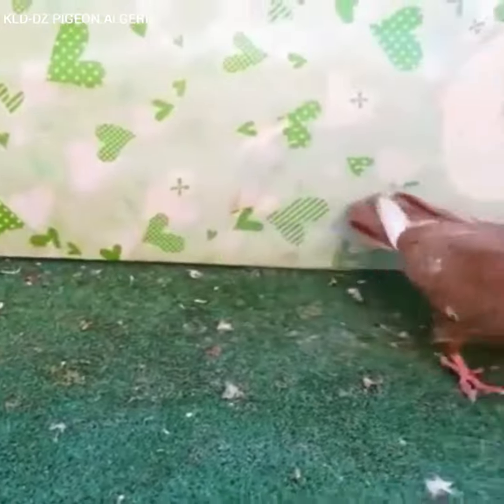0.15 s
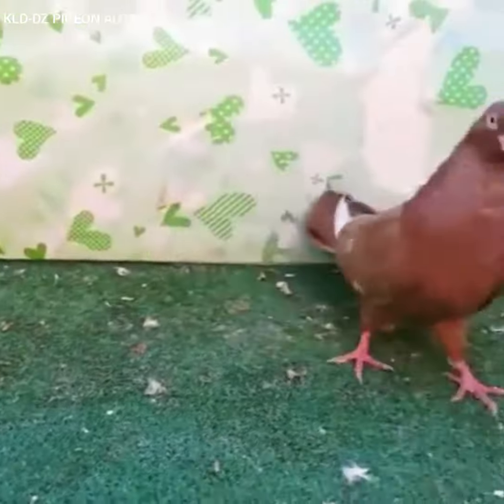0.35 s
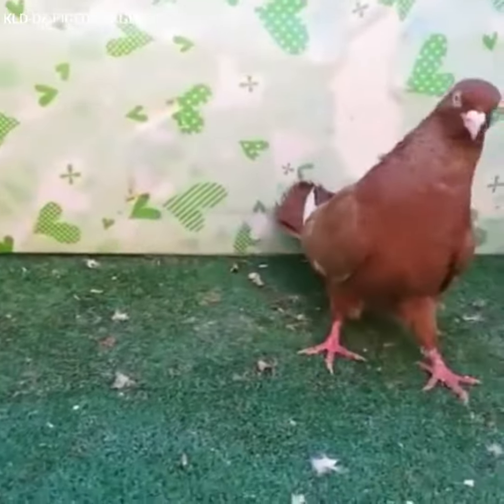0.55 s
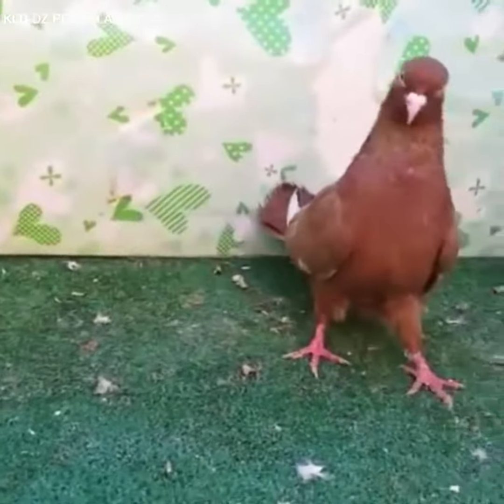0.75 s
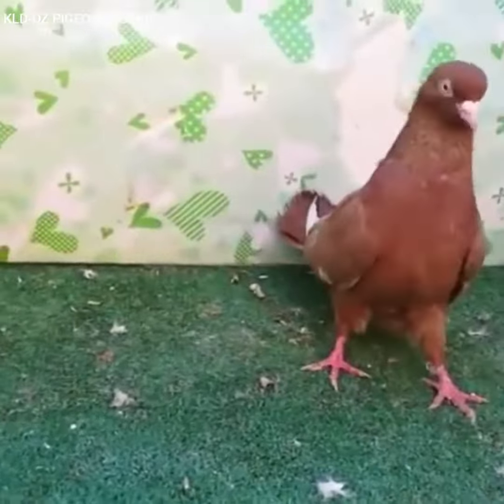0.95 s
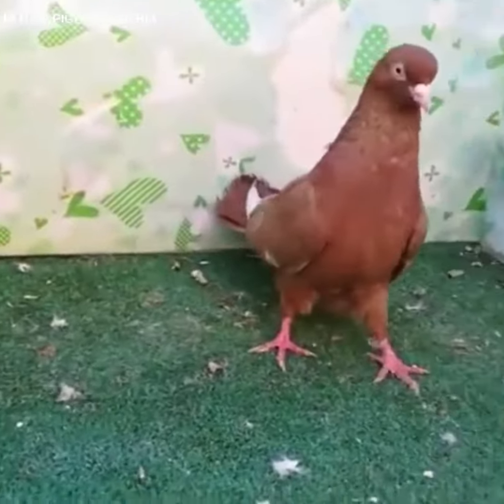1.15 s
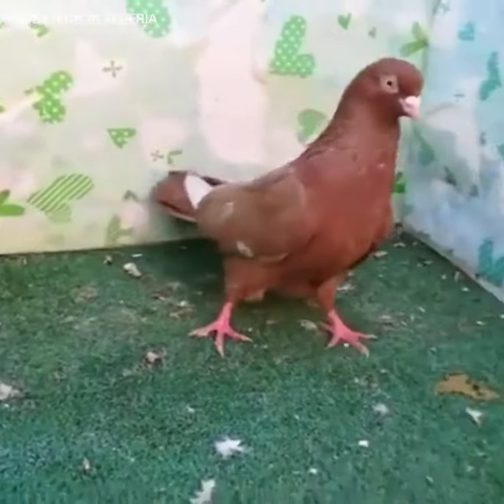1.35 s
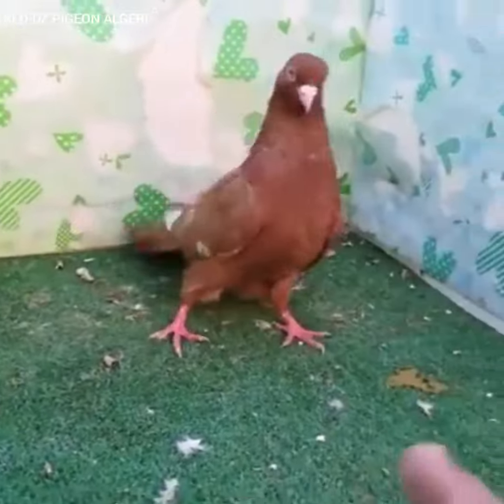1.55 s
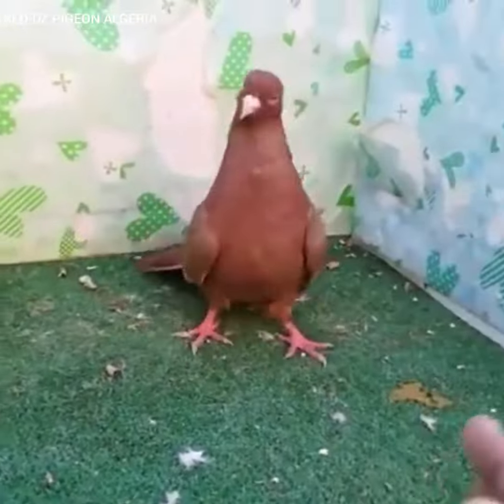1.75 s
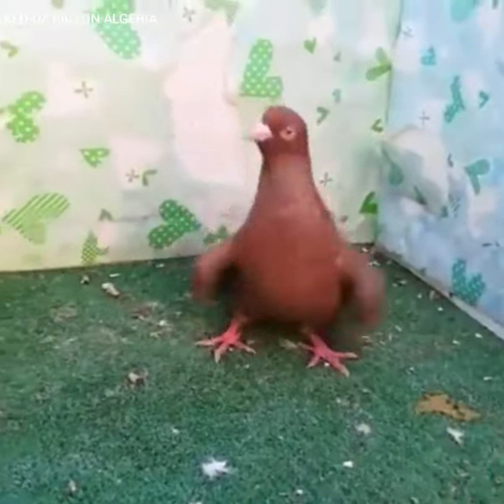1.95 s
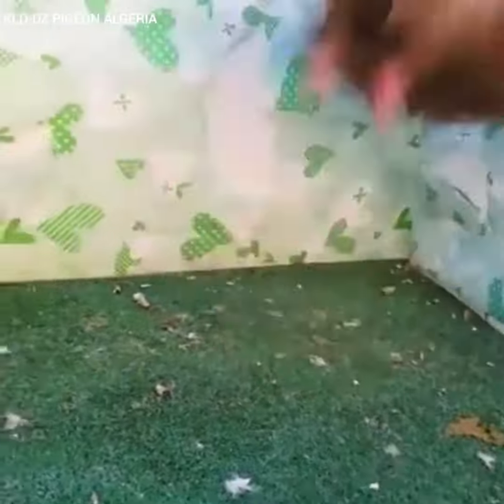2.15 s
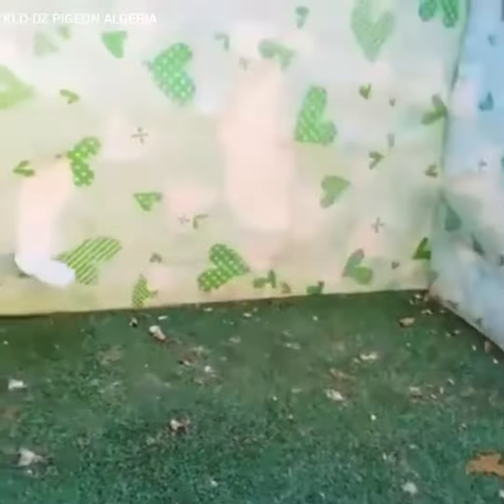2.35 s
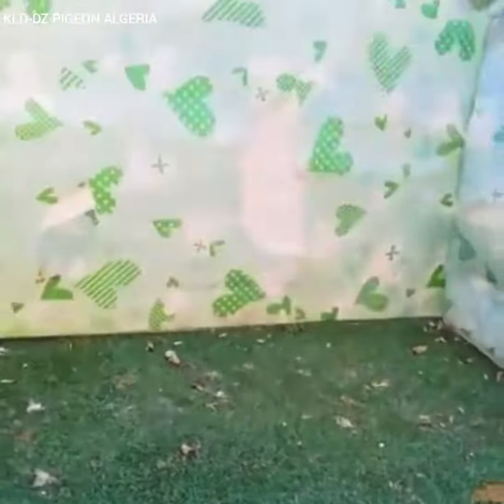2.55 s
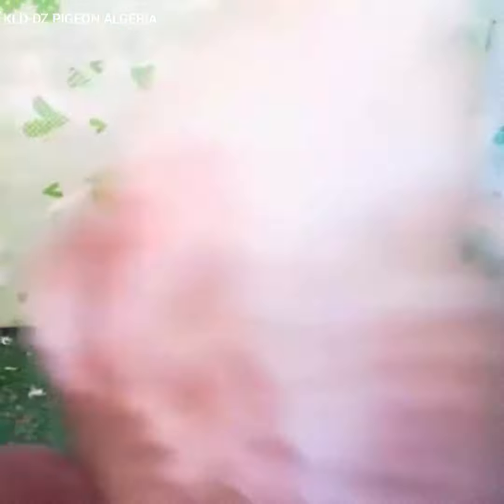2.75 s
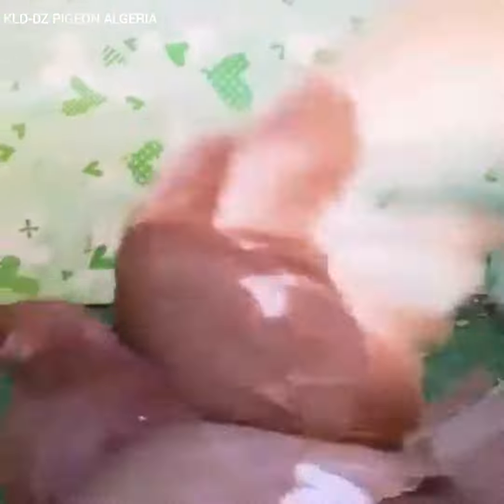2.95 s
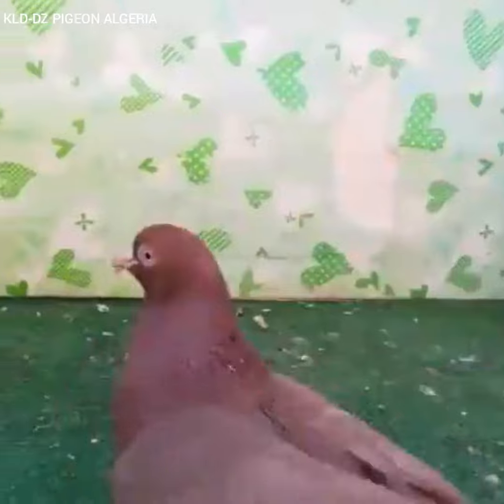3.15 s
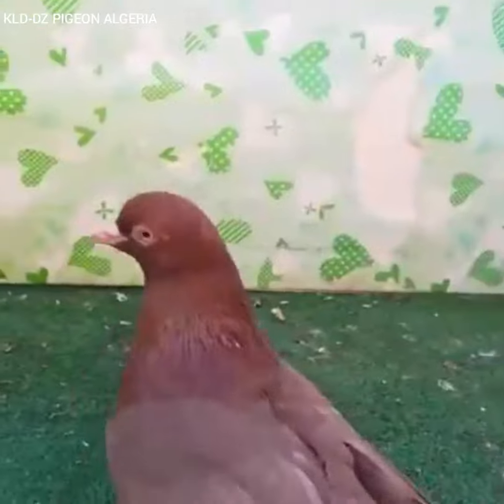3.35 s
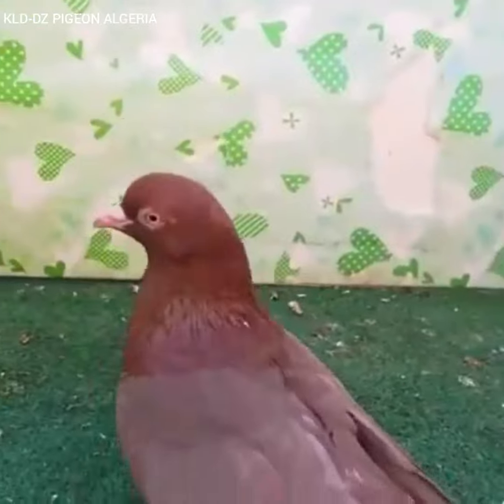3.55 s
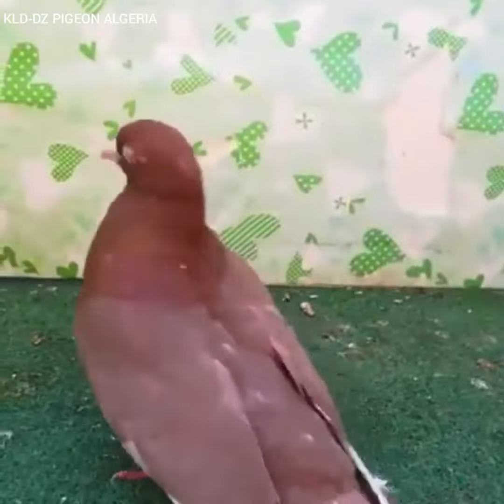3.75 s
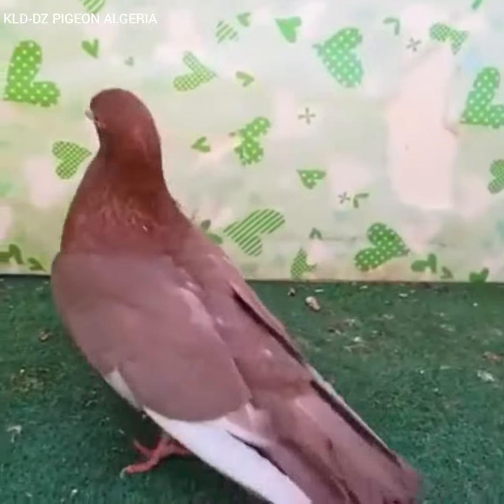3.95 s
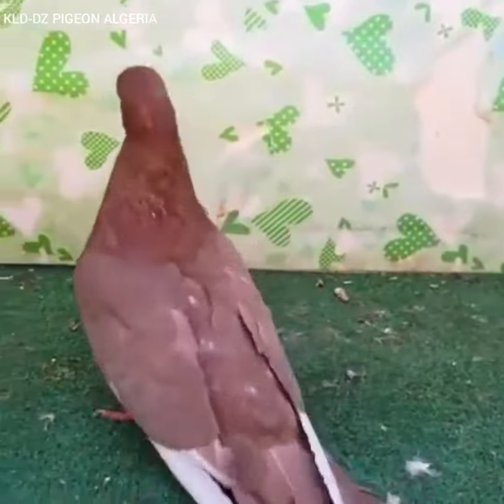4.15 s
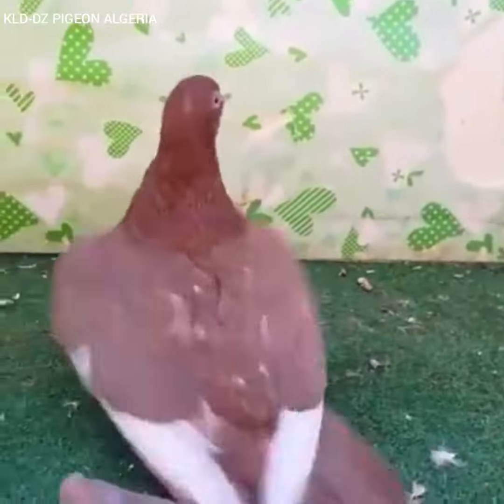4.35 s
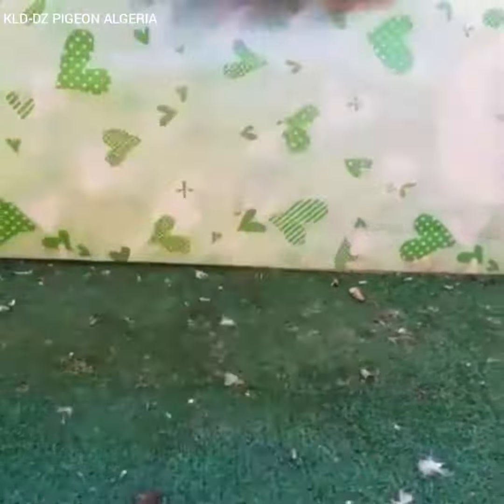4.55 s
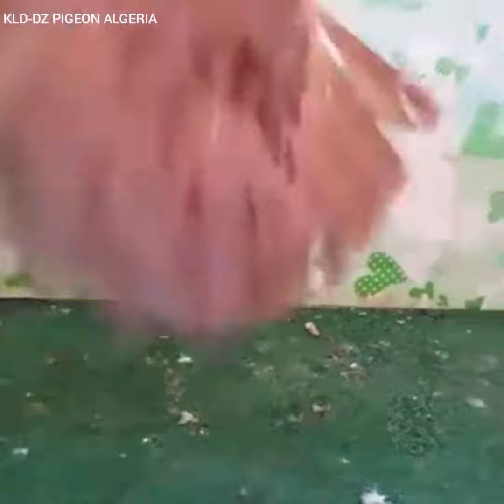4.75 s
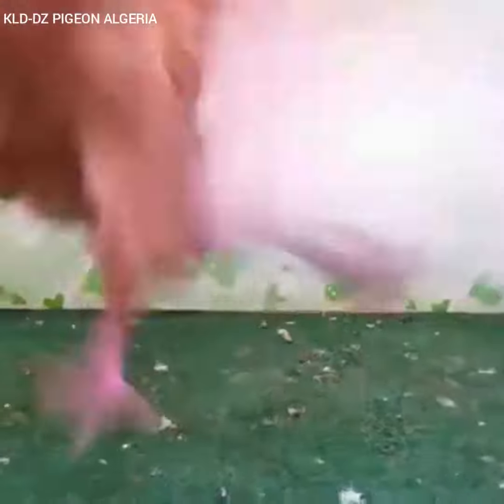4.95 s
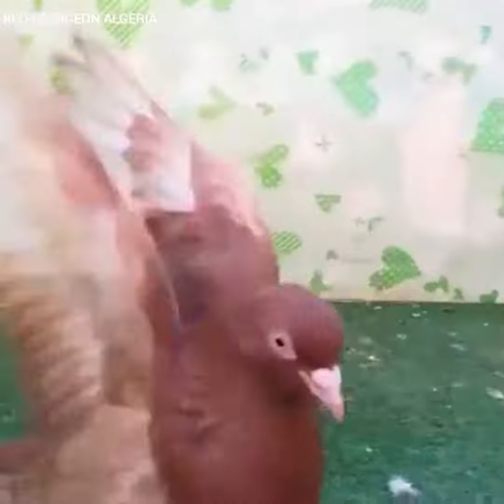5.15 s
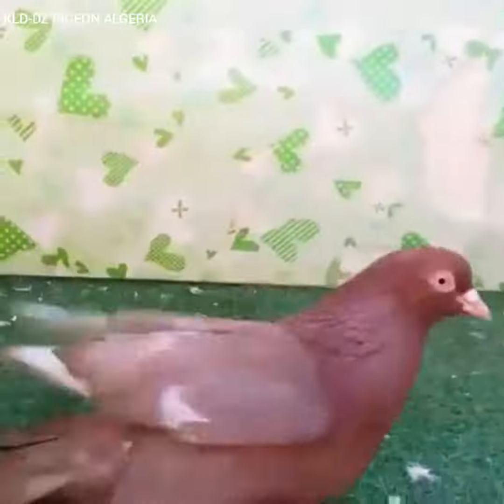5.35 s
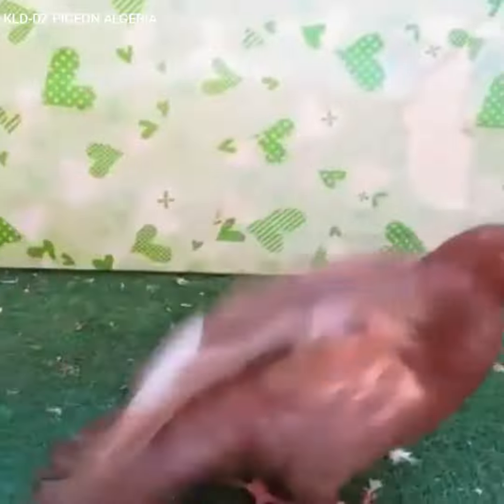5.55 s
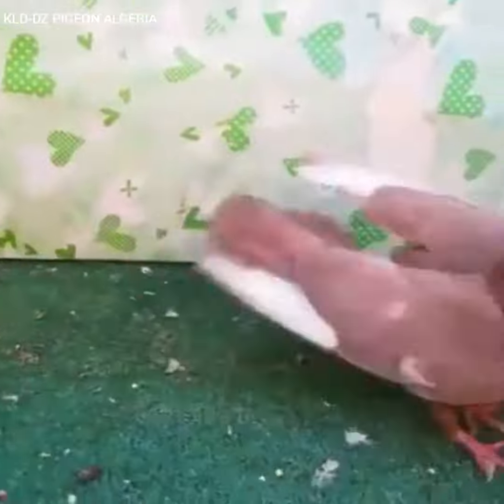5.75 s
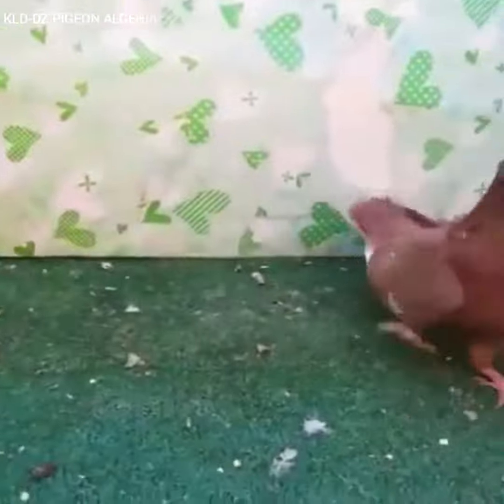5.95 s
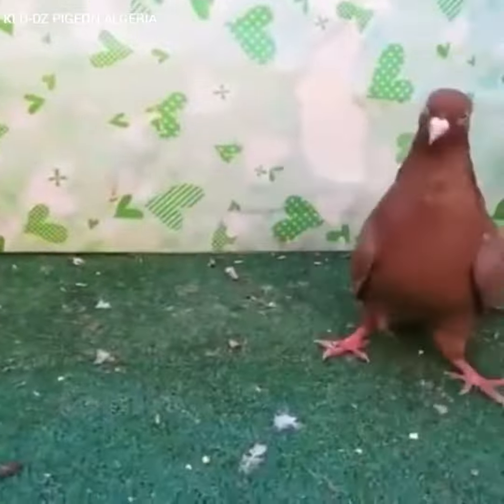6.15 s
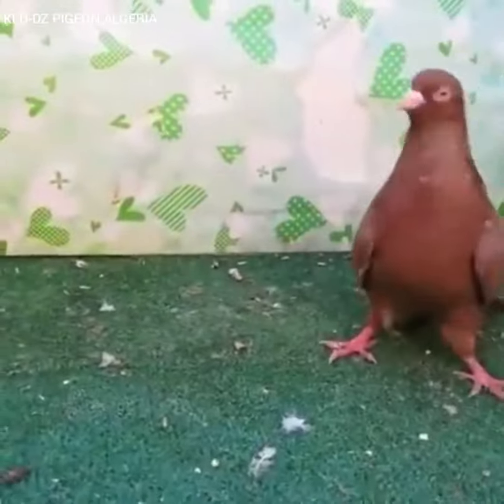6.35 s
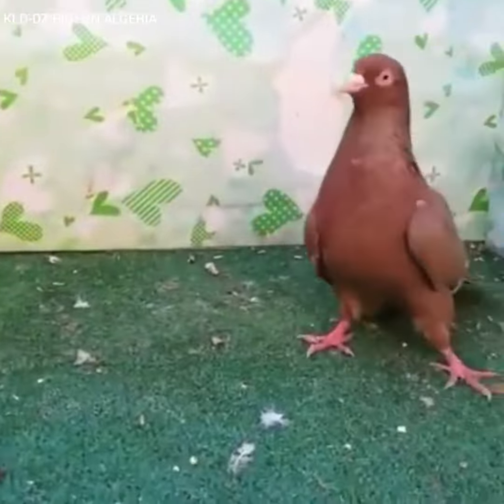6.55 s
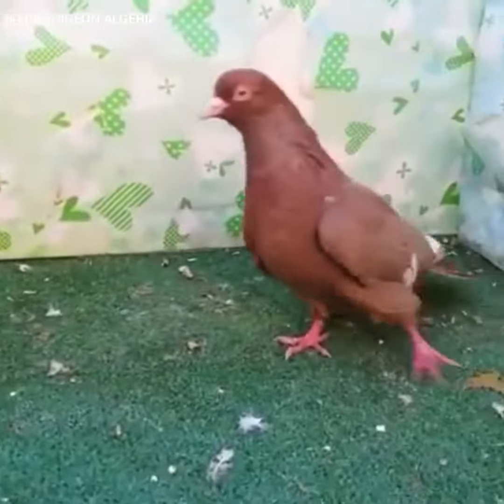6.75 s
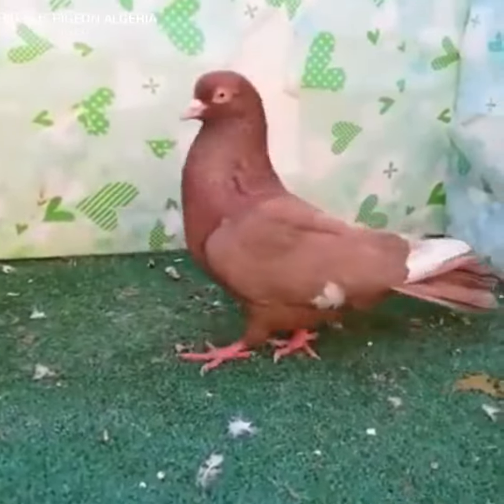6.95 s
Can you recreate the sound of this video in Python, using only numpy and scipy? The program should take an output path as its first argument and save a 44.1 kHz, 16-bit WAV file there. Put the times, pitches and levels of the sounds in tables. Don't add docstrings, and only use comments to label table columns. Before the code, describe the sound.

Close phone pickup in stereo, in a small padded corner open to a yard. Distant chirps and low wavering coos come first, with slight feather brushing and a claw tap. Rapid dry wing claps erupt with low air flutter, fade to a calmer stretch of chirps and hoots, then erupt again with sharp cracks and heavy gusts on the microphone. Afterwards only sparrows, a faint coo and light rustles remain.

```python
import sys
import numpy as np
from scipy import signal
from scipy.fft import rfft, irfft
from scipy.io import wavfile
from scipy.ndimage import uniform_filter1d, minimum_filter1d

SR = 44100
rng = np.random.default_rng(int(sys.argv[2]) if len(sys.argv) > 2 else 0)


def amplitude_ratio(level_db):
    exponent = np.asarray(level_db, float) / 20
    return 10 ** exponent


def store_pcm(level_fs):
    pcm = np.round(np.clip(level_fs, -1, 1) * 32767).astype(np.int16)
    wavfile.write(sys.argv[1], SR, np.atleast_2d(pcm).T)


N = 312228
LAG_S = 0.0006166


def evened(x):
    return x / np.sqrt(np.mean(x ** 2) + 1e-20)


def read(points, hz):
    f, value = np.transpose(points)
    return np.interp(np.log(hz + 1), np.log(f + 1), value)


def coloured(x, spectrum):
    hz = np.fft.rfftfreq(x.shape[-1], 1 / SR)
    return evened(irfft(rfft(x) * amplitude_ratio(read(spectrum, hz)), x.shape[-1]))


def band(x, order, low_hz, high_hz):
    return signal.sosfilt(signal.butter(order, [low_hz, high_hz], "band", fs=SR, output="sos"), x)


def flicker(per_s, depth_db):
    knots = rng.standard_normal(32000)
    wander = np.interp(np.arange(N) / SR * per_s, np.arange(len(knots)), knots)
    return evened(amplitude_ratio(depth_db * wander))


def mottled(x, depth_db):
    z = signal.stft(x, nperseg=256)[2]
    patches = uniform_filter1d(rng.standard_normal(z.shape[-2:]), size=4, axis=0)
    patches = uniform_filter1d(patches, size=9, axis=1)
    return evened(signal.istft(z * amplitude_ratio(depth_db * evened(patches)), nperseg=256)[1][..., :N])


def swells(rows, rise_s, fall_s, rest_db=(-99, -99)):
    t = np.arange(0, N, 16) / SR
    power = amplitude_ratio(2 * np.array(rest_db))[:, None]
    for s, hold, *db in rows:
        under_db = 20 * (np.maximum(s - t, 0) / rise_s + np.maximum(t - s - hold, 0) / fall_s)
        power = power + amplitude_ratio(2 * (np.array(db)[:, None] - under_db))
    return [np.interp(np.arange(N) / SR, t, np.sqrt(p)) for p in power]


def whistle(length, first_hz, last_hz):
    u = np.linspace(0, 1, int(SR * length))
    pitch_hz = first_hz * (last_hz / first_hz) ** u
    return np.sin(np.pi * u ** 0.5) * np.sin(2 * np.pi * np.cumsum(pitch_hz) / SR)


def panned(pan_db):
    return np.array([[pan_db], [-pan_db]]) / 2


def add(mix, s, sound):
    part = mix[..., round(s * SR):][..., :sound.shape[-1]]
    part += sound[..., :part.shape[-1]]


def yard(x, t60):
    t = np.arange(SR // 2) / SR
    signs = rng.choice([-1., 1.], (2, len(t)))
    taps = signs * (rng.random((2, len(t))) < .05) * amplitude_ratio(-60 * t / t60)
    return signal.fftconvolve(x, taps / np.linalg.norm(taps[0]), axes=1)[:, :N]


# frequency in Hz, density in dB per Hz.
WASH = [(15, -53), (25, 4.5), (225, -19), (291, 2), (480, -9.5), (540, -4), (650, -21.5), (817, -11),
        (1010, -25.5), (2360, -11.5), (4160, -11), (5670, -14), (7540, -13), (10000, -76), (12000, -72),
        (15600, -101), (22000, -120)]


def floor():
    wash = mottled(coloured(rng.standard_normal((2, N)), WASH), depth_db=5.0)
    wash = wash * flicker(per_s=6, depth_db=2.5)
    treble = signal.sosfiltfilt(signal.butter(3, 5500, "high", fs=SR, output="sos"), wash)
    return amplitude_ratio(-50) * (wash + [[-.3], [.1]] * treble)


# time in seconds, pitch in Hz, level in dB.
COOS = [
    [(0, 237, -45), (.18, 224, -42)],
    [(.73, 263, -34), (.8, 352, -47)],
    [(.845, 290, -34.5), (.895, 342, -51)],
    [(.93, 310, -45), (.975, 314, -51)],
    [(1.125, 390, -34.5), (1.19, 259, -44), (1.37, 226, -39.5)],
    [(1.38, 303, -36.5), (1.45, 268, -46), (1.51, 192, -43.5)],
    [(1.98, 313, -42), (2.06, 326, -52)],
    [(6.5, 413, -46), (6.56, 357, -40)],
    [(6.575, 334, -42.5), (6.67, 329, -55)],
]
# time in seconds, pitch in Hz, level in dB.
HOOTS = [
    [(.07, 401, -60), (.148, 405.4, -37), (.2, 404, -60)],
    [(3.0, 418, -55), (3.5, 414, -47.5), (4.5, 423, -55.5)],
    [(3.04, 318.5, -41), (3.22, 288, -34)],
    [(3.29, 312, -42), (3.55, 322, -54)],
    [(3.35, 835, -58), (4.3, 827, -63.5)],
    [(3.0, 1150, -54.5), (3.9, 1090, -62)],
    [(5.5, 873, -48), (6.4, 850, -67.5)],
    [(5.5, 314, -53.5), (6.25, 308, -58)],
    [(4.3, 317, -52), (4.36, 338, -36.5)],
    [(4.4, 333, -57), (4.45, 323, -40)],
]


def doves():
    out = np.zeros(N)
    waver = flicker(per_s=40, depth_db=3) * flicker(per_s=9, depth_db=3)
    wobble = flicker(per_s=30, depth_db=.2)
    for rows, sway in [(c, wobble) for c in COOS] + [(h, wobble ** 1.2) for h in HOOTS]:
        s, hz, db = np.transpose(rows)
        t = np.arange(s[0], s[-1], 1 / SR)
        pitch_hz = np.interp(t, s, hz) * sway[:len(t)]
        tone = np.sin(2 * np.pi * np.cumsum(pitch_hz) / SR) * signal.windows.tukey(len(t), .25)
        add(out, s[0], amplitude_ratio(np.interp(t, s, db)) * tone)
    out = out * waver
    return out * [[1.3], [0]] + amplitude_ratio(-8) * yard(out[None], t60=0.13)


# start in seconds, length in seconds, middle pitch in Hz, level in dB.
CHATTER = [(0, 0.026, 4420, -42), (0.076, 0.1, 2874, -48.5), (0.129, 0.12, 4375, -43),
           (0.199, 0.22, 3798, -38.5), (0.554, .16, 3826, -41), (0.735, 0.14, 3485, -43),
           (0.86, 0.18, 3860, -38.5), (1.064, 0.12, 4300, -39), (1.173, 0.15, 3690, -39.5),
           (1.357, 0.16, 3956, -40), (1.528, 0.11, 4560, -43.5), (1.626, 0.18, 4170, -43),
           (1.88, 0.21, 3924, -40), (1.968, 0.16, 2980, -42), (2.892, 0.13, 4210, -37),
           (3.042, 0.21, 4190, -36.5), (3.407, 0.22, 4680, -39), (3.579, 0.1, 4695, -40),
           (3.751, 0.11, 4165, -42), (3.804, 0.21, 2843, -48), (3.886, 0.16, 4090, -39.5),
           (4.063, 0.16, 4140, -38.5), (4.183, .17, 4190, -37.5), (4.352, 0.1, 4120, -48),
           (5.481, 0.14, 3756, -41), (5.651, 0.15, 4860, -47.5), (5.845, 0.17, 3720, -41.5),
           (6.199, 0.16, 4140, -36.5), (6.381, 0.086, 4465, -39.5), (6.48, 0.19, 4000, -42),
           (6.512, 0.12, 2490, -45), (6.77, 0.18, 4274, -36), (6.892, 0.11, 3970, -43),
           (7.041, 0.014, 5700, -46.5)]
# start in seconds, length in seconds, first and last pitch in Hz, level in dB.
NOTES = [(0.082, 0.065, 5700, 4600, -48.5), (0.088, .022, 2190, 2390, -46), (0.094, .03, 2790, 3270, -45.5),
         (0.229, 0.025, 4490, 4470, -27.5), (0.245, 0.038, 4150, 3380, -33.5),
         (0.303, .04, 3186, 3250, -39), (0.583, 0.0059, 4260, 4350, -29), (.595, 0.012, 4340, 3900, -31.5),
         (0.93, 0.013, 4230, 4290, -29.5), (.955, .015, 4150, 4020, -36), (1.111, .0075, 4170, 4400, -25.5),
         (1.123, 0.012, 4530, 4650, -35), (1.175, 0.015, 4020, 4350, -33.5), (1.243, .025, 3600, 3030, -36),
         (1.374, 0.013, 4730, 4950, -37), (1.557, 0.027, 4410, 4270, -29),
         (1.657, 0.031, 4120, 4110, -33.5), (1.914, .05, 3520, 3630, -43), (1.98, 0.053, 4200, 4470, -36),
         (3.428, .03, 4910, 4280, -42), (3.51, 0.042, 3820, 4640, -31.5), (3.618, 0.019, 4003, 4370, -28.5),
         (3.611, 0.052, 4900, 5000, -49), (3.899, 0.016, 4540, 3880, -32.5), (4.206, .014, 4900, 5070, -34),
         (4.227, 0.014, 4260, 4110, -26), (4.247, .014, 4040, 4000, -26), (4.267, 0.014, 4050, 4340, -24),
         (4.316, 0.015, 4130, 4160, -25.5), (4.329, .028, 4070, 4170, -24.5),
         (5.497, 0.054, 4260, 3860, -34.5), (5.547, 0.0059, 4200, 3550, -27),
         (5.68, 0.024, 4660, 5090, -35), (6.182, 0.014, 3210, 4400, -50), (6.217, .018, 4260, 3830, -35),
         (6.253, 0.05, 3520, 4270, -35), (6.389, 0.038, 5410, 4070, -37), (6.455, 0.028, 4300, 4700, -26.5),
         (6.481, 0.014, 4100, 4600, -30)]
# start in seconds, length in seconds, first pitch in Hz, level in dB.
SLIDES = [(0.751, 0.077, 2405, -42), (0.783, 0.025, 3950, -52), (0.913, 0.058, 3625, -39.5),
          (2.073, 0.019, 3400, -50), (4.354, 0.07, 2940, -41.5), (4.378, 0.035, 3770, -44),
          (4.408, 0.029, 3250, -41), (6.519, .04, 2860, -42.5), (6.615, 0.044, 3800, -44.5),
          (6.965, 0.066, 2860, -44)]


def sparrows():
    crowd, clear = np.zeros((2, N))
    sag_octaves_per_s = 2.22
    for s, length, middle_hz, db in CHATTER:
        phrase = np.zeros(int(SR * length) + 1200)
        for at, offset, other, glide, size, long in rng.random((48, 6)):
            sag = 2 ** (sag_octaves_per_s * length * (.5 - at))
            hz = middle_hz * sag * np.exp(0.3 * (offset + other - 1))
            bend = np.exp(0.3288 * glide - .29)
            level = amplitude_ratio(-3.2 * np.log(size + 0.049))
            add(phrase, at * length, level * whistle(0.0065 + 0.025 * long, hz / bend, hz * bend))
        phrase = evened(phrase) * signal.windows.tukey(len(phrase), .7)
        add(crowd, max(s - .025, 0), amplitude_ratio(db) * phrase)
    for s, length, first_hz, last_hz, db in NOTES:
        add(clear, s, amplitude_ratio(db) * whistle(length, first_hz, last_hz))
    for s, length, first_hz, db in SLIDES:
        add(clear, s, amplitude_ratio(db) * whistle(length, first_hz, .69 * first_hz))
    crowd = crowd * flicker(per_s=150, depth_db=2)
    clear = clear * flicker(per_s=260, depth_db=2.5)
    near = amplitude_ratio(-4.0) * crowd + clear
    far = np.roll(signal.hilbert(near).imag, -round(LAG_S * SR))
    return np.array([near, far]) + amplitude_ratio(-2.5) * yard((crowd + .6 * clear)[None], t60=0.22)


# frequency in Hz, density in dB per Hz.
BUFFET = [(8.8, -53), (15, -1.5), (70, -1.5), (109, -6), (152, -7), (206, -12), (265, -9), (300, -10.5),
          (390, -64), (660, -120)]
FLUTTER = [(82, -20.5), (140, -13), (232, -9.5), (275, -10), (430, -10.5), (540, -16), (742, -22.5),
           (1500, -35), (1950, -29.5), (3300, -120)]
# start in seconds, hold in seconds, buffet in dB, flutter in dB.
GUSTS = [(0, 0.18, -56, -52.5), (.3, 0.57, -53, -85), (1.2, 0.57, -68, -56.5), (2.19, 0.55, -31.5, -41.5),
         (2.84, 0.23, -33.5, -40), (3.2, 0.11, -43, -49), (4.05, 0.062, -65, -57.5),
         (4.4, 0.036, -51.5, -58), (4.57, 0.48, -32, -47), (4.8, 0.24, -28, -35.5),
         (5.05, 0.12, -30.5, -43), (5.3, 0.15, -29.5, -41.5), (5.6, 0.2, -41.5, -75)]
CALM_DB = (-63.5, -61.5)
# start in seconds, hold in seconds, buffet in dB, flutter in dB.
BLASTS = [
    (.72, 0.093, -53, -53),
    (1.62, 0.063, -64, -55.5),
    (1.77, 0.075, -57, -53),
    (4.885, 0.086, -17.5, -23),
    (5.33, 0.077, -35, -40.5),
]
# start in seconds, peak in dB, pitch in Hz, push (+) or suction (-) factor.
THUMPS = [(1.786, -39, 173, 1.5), (3.902, -33, 225, 1), (4.696, -20, 62, -1.1), (4.877, -12.5, 141, -0.9),
          (4.89, -11.5, 60.4, -2.5), (4.91, -17.5, 129, -2), (4.916, -11, 107, 0.5), (4.948, -11, 98, -1),
          (4.96, -12, 89, -1.7), (5.329, -10, 146, 1), (5.343, -14.5, 140, 0.5), (5.361, -20, 110, 1.4),
          (5.387, -15, 242, 1.03), (5.393, -26, 178, 2.5), (5.401, -7, 176, 1), (5.47, -12.5, 136, 0.73),
          (5.623, -17, 119, 1), (6.161, -35, 168, 1)]


def downwash():
    gusts = swells(GUSTS, rise_s=0.055, fall_s=0.27, rest_db=CALM_DB)
    blasts = swells(BLASTS, rise_s=0.018, fall_s=0.024)
    buffet, flutter = np.hypot(gusts, blasts)
    slow, fast = rng.standard_normal((2, 2, N))
    out = amplitude_ratio(-0.35) * buffet * flicker(per_s=20, depth_db=3.0) * coloured(slow, BUFFET)
    out += amplitude_ratio(5.0) * flutter * flicker(per_s=60, depth_db=2.8) * coloured(fast, FLUTTER)
    roar = evened(band(slow, 2, 550, 1150))
    out += amplitude_ratio(13.5) * flutter ** 1.74 * roar
    differences = rng.uniform([.7, -1.5], [1.6, 1.5], (len(THUMPS), 2))
    for (s, db, hz, way), (skew, apart) in zip(THUMPS, differences):
        turns = np.arange(3000) / SR * hz
        push = np.sin(2 * np.pi * turns * [[1], [skew]]) * np.exp(-(turns / 1.05) ** 2)
        add(out, s, way * amplitude_ratio(db) * push * [[1], [1.2 * apart]])
    return out


# start in seconds, peak in dB, middle frequency in Hz, left-right in dB.
SNAPS = [(2.17, -32, 6500, 9), (2.173, -15, 6640, 2), (2.196, -15, 4900, 7), (2.282, -19, 8300, 14),
         (2.365, -3, 5250, -3), (2.467, -2.5, 3070, 4), (2.574, -32.5, 3800, 10), (2.654, -16, 6450, -12),
         (2.668, -2, 3430, 2), (2.725, -19, 7000, 4), (2.768, -9, 7000, -7), (2.842, -15, 7500, -2),
         (4.584, -17, 9600, -21), (4.612, -10.5, 7800, -13), (4.637, -17, 6940, -4), (4.918, -9, 7100, -11),
         (5.017, -9, 6240, 0), (5.041, -18, 7240, 5), (5.06, 6, 3750, -4.5), (5.062, -29, 9400, 3),
         (5.222, -13, 4970, -1), (5.269, -14, 6470, 9)]
# start in seconds, length in seconds, first and last pitch in Hz, level in dB.
CLAWS = [
    (1.411, 0.016, 1060, 550, -43),
    (1.756, 0.0067, 940, 730, -30),
    (4.256, 0.002, 1460, 885, -38),
    (5.466, 0.0023, 1980, 700, -25),
]


def snaps():
    out, t = np.zeros((2, N)), np.arange(400) / SR
    bursts = rng.standard_normal((len(SNAPS), 2, 400)) * np.exp(-t / 0.0012)
    for (s, db, hz, pan_db), burst in zip(SNAPS, bursts):
        crack = band(burst, 4, hz / 1.9, hz * 1.3)
        add(out, s - .0005, amplitude_ratio(db - 2.5 + panned(pan_db)) * crack)
    for s, length, first_hz, last_hz, db in CLAWS:
        add(out, s, amplitude_ratio(db) * whistle(length, first_hz, last_hz)[None])
    return out


# frequency in Hz, density in dB per Hz.
FINE = [(1290, -34), (2200, -3.5), (3010, -2.5), (5700, 0.5), (7730, 3), (10100, -11.5), (11400, -17),
        (11900, -42), (12300, -41), (13000, -72)]
COARSE = [(240, -31), (400, -1), (540, 4.5), (660, 6.5), (816, 4), (1080, 0), (1450, 1), (2220, -1),
          (4000, -4.5), (5200, -16.5), (8800, -120)]
# start in seconds, hold in seconds, fine rustle in dB, coarse rustle in dB.
STROKES = [(2.115, 0.056, -54.5, -46.5), (2.165, 0.063, -33, -31.5), (2.282, 0.071, -31.5, -37),
           (2.4, 0.07, -33, -30), (2.515, 0.074, -30.5, -31), (2.6, 0.075, -31, -27.5),
           (2.7, 0.19, -46, -41.5), (2.905, 0.073, -47, -35), (3.0, 0.12, -48.5, -46.5),
           (3.17, 0.11, -48.5, -43), (4.575, 0.0098, -37.5, -43), (4.6, 0.034, -33.5, -31.5),
           (4.66, 0.13, -46.5, -42), (4.8, 0.078, -38.5, -37.5), (4.915, 0.043, -34.5, -29.5),
           (4.988, 0.02, -39, -49), (5.062, 0.01, -31.5, -30), (5.1, 0.084, -47, -45),
           (5.185, 0.025, -42, -36.5), (5.23, 0.058, -48.5, -39)]
# start in seconds, hold in seconds, fine in dB, coarse in dB.
BRUSHES = [(.32, 0.21, -58.5, -62.5), (.75, 0.11, -66, -54.5), (1.1, 0.09, -81, -82),
           (1.4, 0.035, -59, -49), (1.62, 0.37, -52, -52), (3.4, 0.1, -54, -55.5), (3.76, 0.15, -55, -52.5),
           (4.53, 0.037, -53, -50), (5.7, 0.076, -54.5, -50), (5.8, 0.21, -62, -52.5),
           (6.8, 0.071, -65, -79)]
REST_DB = (-67.5, -65)
# start in seconds, peak in dB, coarse part in relative dB, length in seconds, left-right in dB.
SLAPS = [(1.76, -46.5, 9, 0.016, -6), (1.787, -48, 11, 0.0085, -13), (2.143, -27.5, 1, 0.0029, 0),
         (2.168, -4.5, -15.5, 0.0045, -16), (2.189, -14.5, -8, 0.0054, -6), (2.201, -11, -22, 0.016, -4),
         (2.231, -19, -7, 0.003, -11), (2.28, -61, -39, 0.0033, -7), (2.303, -10, -18, 0.0088, 2),
         (2.336, -17.5, -2, 0.045, -16), (2.362, -21, 1.5, 0.014, -12), (2.395, -47.5, -6, .005, 6),
         (2.412, -46.5, -21, 0.0033, -7), (2.466, -6.5, -11.5, 0.0064, 7), (2.522, -19, -18, .007, -1),
         (2.53, -7.5, -16, 0.019, -2.5), (2.565, -11, -15, 0.0042, 6), (2.605, -26, -14, 0.0053, 16),
         (2.647, -12, -9, 0.018, 5), (2.663, -10.5, -4.5, 0.0084, -3), (2.686, -11, -26, 0.0085, -1),
         (2.722, -14, -9, 0.0059, -10), (2.738, -20, -6, 0.0051, 1), (2.76, -11, -12, 0.029, -6),
         (2.841, -23.5, 0.5, 0.0068, 0.5), (4.578, -14.5, -12.5, 0.0093, 1.5),
         (4.603, -15.5, -9, 0.018, -13), (4.63, -24, -20, 0.0032, -24), (4.633, -10, -10, 0.009, -6),
         (4.817, -18.5, 4, 0.011, -4), (4.881, -11.5, -13.5, 0.0038, 3), (4.917, -11, -3.5, 0.0067, 2),
         (4.931, -10, -25, 0.016, 8.5), (4.992, -18.5, -3, 0.0097, 6), (5.011, -6.5, -9.5, 0.0059, -5),
         (5.038, -11, -1, 0.0036, -3.5), (5.054, -5.5, -12, 0.0044, 8.5), (5.066, -30, 8, 0.0044, 28.5),
         (5.2, -27, -27, 0.0056, 7), (5.215, -22.5, -9, 0.0059, 21), (5.265, -11, -8.5, 0.0081, 2),
         (5.272, -13, -4, 0.0034, -2)]


def feathers():
    strokes = swells(STROKES, rise_s=0.025, fall_s=0.049)
    brushes = swells(BRUSHES, rise_s=0.11, fall_s=0.16, rest_db=REST_DB)
    fine, coarse = np.hypot(strokes, brushes)
    spurts = np.tile(flicker(per_s=90, depth_db=1.5) * flicker(per_s=180, depth_db=1), (2, 1))
    fine = (amplitude_ratio(6.0) * fine * spurts) ** 2
    coarse = (amplitude_ratio(0.5) * coarse * spurts) ** 2
    t = np.arange(-300, 1500) / SR
    for s, db, coarse_rel_db, length, pan_db in SLAPS:
        shape = np.exp(-(abs(t) / np.where(t < 0, 0.14 * length, length)) ** 1.9)
        power = (amplitude_ratio(db - 11.5 + panned(np.clip(pan_db, -9, 9))) * shape) ** 2
        add(fine, s + 0.0024 + t[0], power)
        add(coarse, s + 0.0033 + t[0], power * amplitude_ratio(2 * coarse_rel_db + 12.5))
    crackle = flicker(per_s=1500, depth_db=2.5) * flicker(per_s=450, depth_db=1.6)
    crackle = mottled(rng.standard_normal((2, 2, N)) * crackle, depth_db=3.8)
    near = np.sqrt(fine) * coloured(crackle[0], FINE) + np.sqrt(coarse) * coloured(crackle[1], COARSE)
    return near + amplitude_ratio(-19) * yard(near, t60=.05)


def scene():
    return floor() + doves() + sparrows() + downwash() + snaps() + feathers()


# start in seconds, length in seconds.
WIDE = [(.32, .015), (1.07, .015), (1.79, .03), (2.2, .015), (2.76, .47), (3.27, .18), (4.37, .04),
        (4.56, .18), (4.83, .94)]
# time in seconds, level in dB.
BRIGHT = [
    (4.5854, -4),
    (5.063, -8),
]


def thrifty(x):
    mid_side = np.array([x[0] + x[1], x[0] - x[1]]) / 2
    z = signal.stft(mid_side, nperseg=1024)[2][:, :512]
    hz = (np.arange(64)[:, None] + .5) * SR / 128
    band_power = (abs(z) ** 2).reshape(2, 64, 8, -1).mean(2)
    band_db = 10 * np.log10(uniform_filter1d(band_power, size=3, axis=2) + 1e-20)
    masker_db = band_db.max(0) - 18.0 * (hz < 700)
    near_db = -minimum_filter1d(-masker_db, size=6, axis=0, origin=2)
    whim_db = 9.1 * evened(uniform_filter1d(rng.standard_normal(near_db.shape), size=9, axis=1))
    edge_db = np.interp(hz, [8000, 11700, 12300], [-50, -16, -50])
    edge_db = edge_db + 0.69 * (masker_db.max(0) + 57.0) - 79.0
    keep = (band_db > near_db - 21.0 + whim_db) & (band_db > edge_db + whim_db)
    wander = evened(uniform_filter1d(rng.standard_normal(z.shape[-1]), size=7))
    keep &= hz < np.minimum(11500 + 800 * wander, 12050)
    keep[:, :2] = True
    fine = uniform_filter1d(uniform_filter1d(abs(z) ** 2, size=3, axis=1), size=5, axis=2)
    faint = fine < amplitude_ratio(-9.0) * uniform_filter1d(fine, size=15, axis=1)
    faint[:, :10] &= fine[:, :10] < amplitude_ratio(-196)
    z = np.pad(z * np.repeat(keep, 8, axis=1) * ~faint, [(0, 0), (0, 1), (0, 0)])
    mid, side = signal.istft(z, nperseg=1024)[1][:, :N]
    t = np.arange(N) / SR
    wide = uniform_filter1d(sum((t > s) & (t < s + length) for s, length in WIDE) * 1., size=600)
    side_bass = signal.sosfiltfilt(signal.butter(5, 300, fs=SR, output="sos"), side)
    side = side - (1 - wide) * side_bass
    top = signal.sosfilt(signal.butter(8, 11800, "high", fs=SR, output="sos"), x)
    opened = sum(amplitude_ratio(db) * np.exp(-((t - s) / 0.0033) ** 2) for s, db in BRIGHT)
    return np.array([mid + side, mid - side]) + opened * top


def band_limit(x):
    return signal.sosfilt(signal.butter(12, 16090, fs=SR, output="sos"), x)


# frequency in Hz, left-right likeness from 0 to 1.
SAME = [(50, .995), (85, .87), (180, .66), (350, .6), (700, .6), (1400, .35), (10000, .25)]
# frequency in Hz, left-right in dB.
LEAN = [(60, -0.5), (170, 0), (290, -0.5), (640, 3.5), (1410, 3.5), (3100, 3), (6820, -5.5), (15000, -5.5)]
# frequency in Hz, lag in radians.
TURN = [(85, 0), (180, .12), (350, .7), (520, .95), (1550, .6), (5500, -.6)]


def record(dry):
    hz = np.fft.rfftfreq(N, 1 / SR)
    same = np.clip(read(SAME, hz), 0, 1)
    left, apart = rfft(dry)
    lag = np.exp(-1j * (2 * np.pi * hz * LAG_S + read(TURN, hz)))
    right = (same * left + np.sqrt(1 - same ** 2) * apart) * lag
    lean = amplitude_ratio(read(LEAN, hz) / 2)
    ports = irfft(np.array([left * lean, right / lean]), N)
    mix = thrifty(np.tanh(ports * 1.075) / 1.117)
    return band_limit(mix)


dry = scene()
out = record(dry)
store_pcm(out)
```